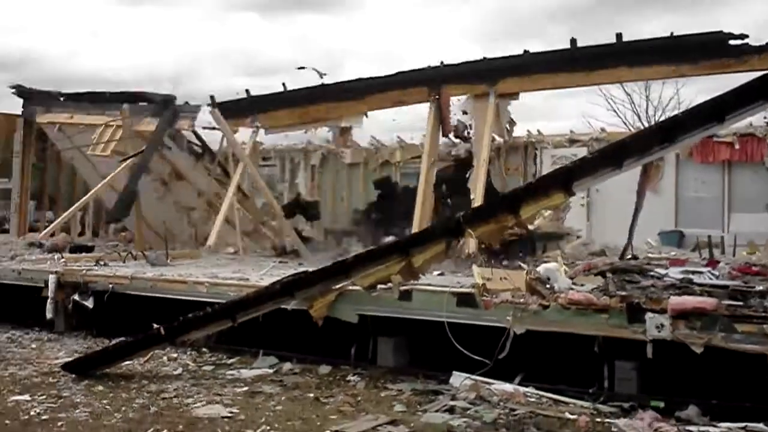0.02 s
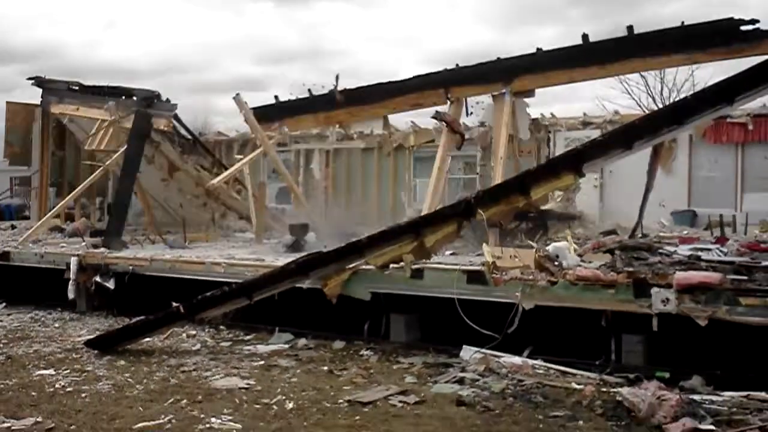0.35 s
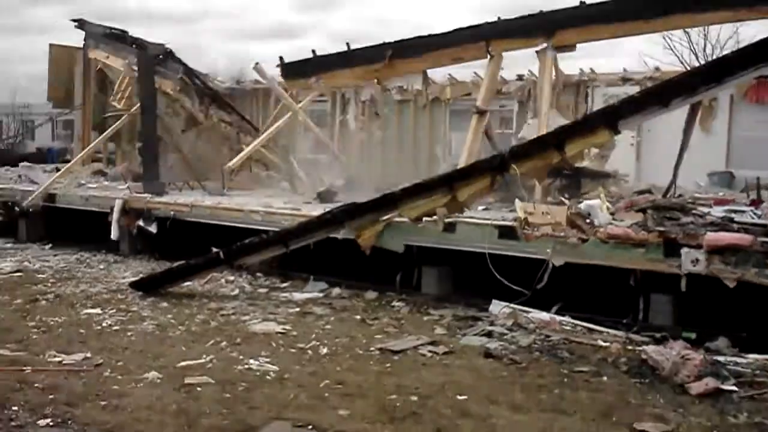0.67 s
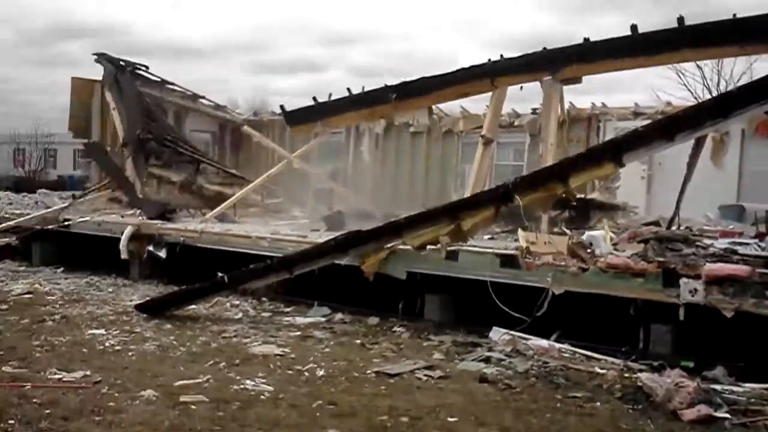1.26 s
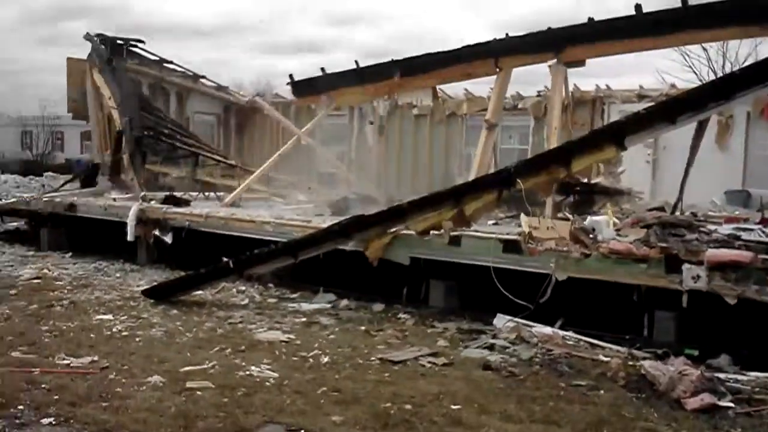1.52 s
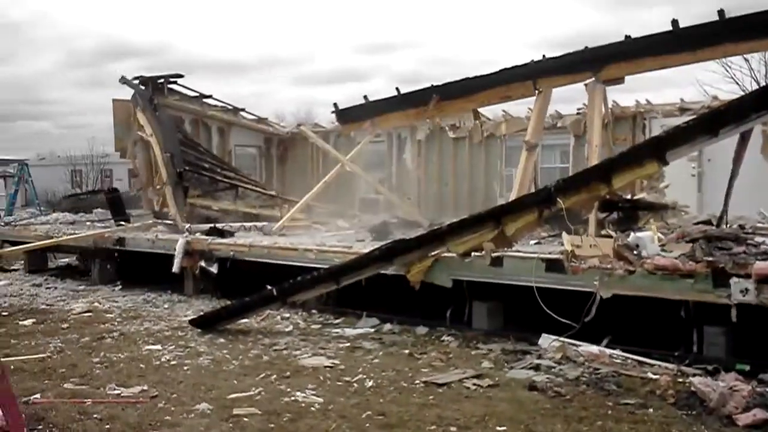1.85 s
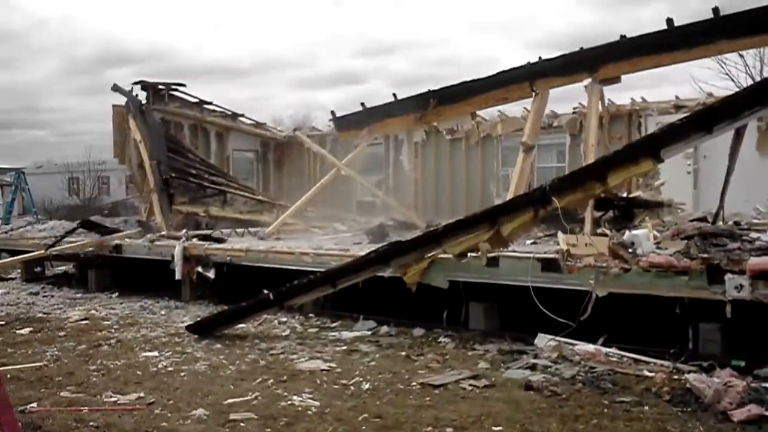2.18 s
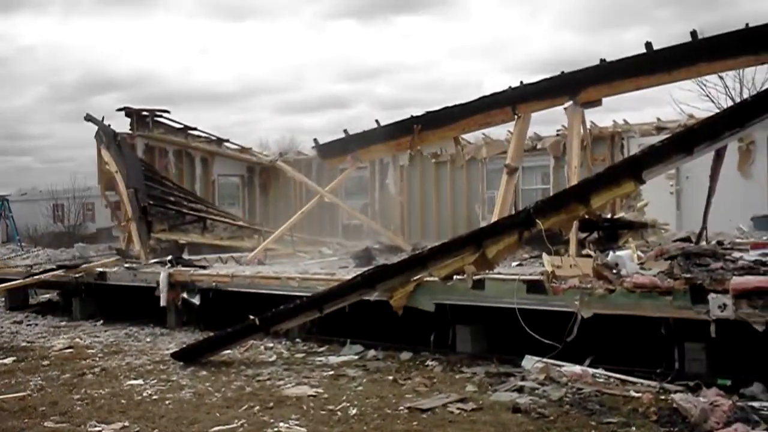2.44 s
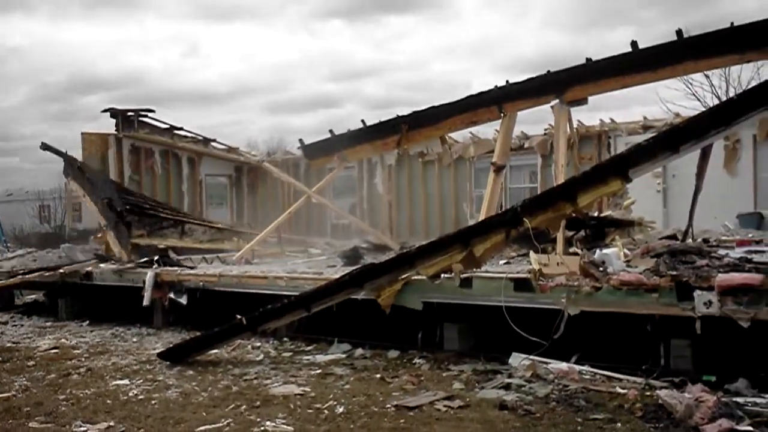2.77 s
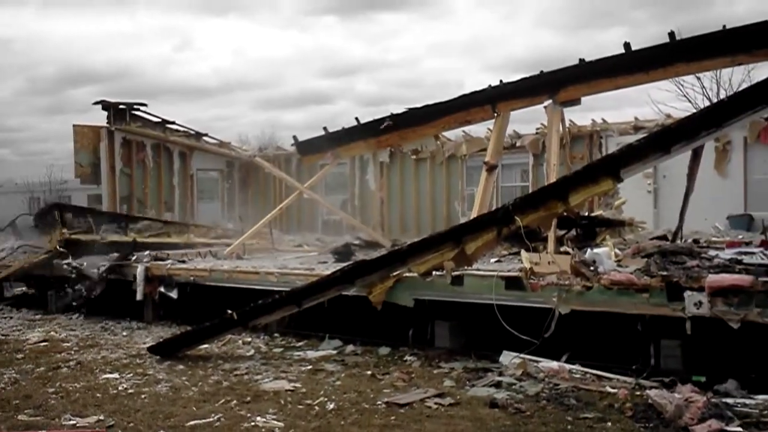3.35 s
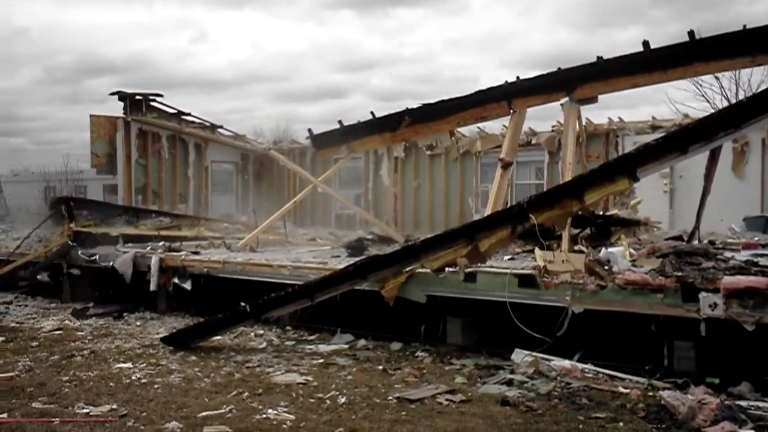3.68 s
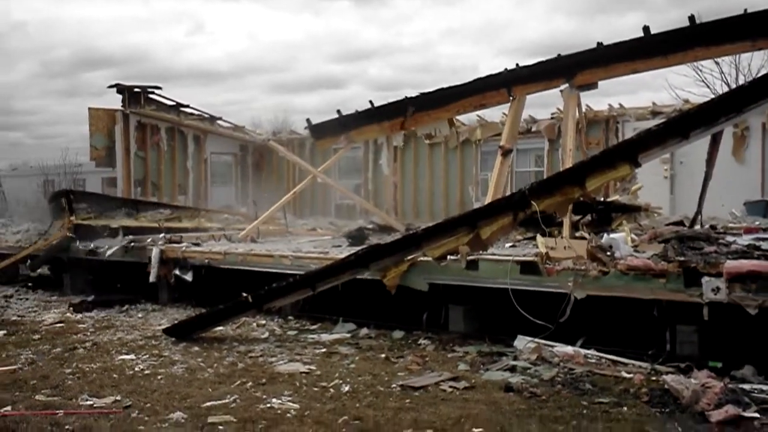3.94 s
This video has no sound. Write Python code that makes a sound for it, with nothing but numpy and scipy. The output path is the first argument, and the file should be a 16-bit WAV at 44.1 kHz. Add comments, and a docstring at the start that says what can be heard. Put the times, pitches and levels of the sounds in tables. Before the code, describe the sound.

Timber crashes down with sharp snaps, knocking boards and pattering splinters above a low rumble.

```python
"""Pulling down a burnt-out timber house

Heard from the yard, a wall crashes in: studs snap and tear fibre by fibre, loose boards knock and ring
on the deck, and heavy timber makes it shudder. Scraps clatter and splinters patter down throughout;
near the end a heavy beam lands. A low rumble of wind or machinery lies underneath.
The loudest blows clip, and the highs are cut off steeply above 7.6 kHz."""
import sys
import numpy as np
from scipy import signal
from scipy.fft import rfft, irfft
from scipy.io import wavfile

SR = 44100
rng = np.random.default_rng(int(sys.argv[2]) if len(sys.argv) > 2 else 0)


def persist_wave(psi):
    """Save psi, clipped to +-1, as 16-bit WAV."""
    counts = np.round(np.clip(psi, -1, 1) * 32767).astype(np.int16)
    wavfile.write(sys.argv[1], SR, np.atleast_2d(counts).T)


N = 176400
TIME = np.arange(N) / SR

# fader rides for the falling debris: (time [s], clatter level [dB], splinter level [dB])
DEBRIS_LEVELS = [(0.0, -4, -5.5), (0.26, -11.5, -9), (0.4, -12.5, -12.5), (0.7, -23, -19),
                 (0.93, -21, -18.5), (1.14, -22, -18), (1.65, -16.5, -15), (1.8, -18.5, -17.5),
                 (2.21, -29.5, -25), (2.45, -29.5, -23.5), (2.7, -26, -24), (2.85, -20, -20.5),
                 (2.99, -22, -23.5), (3.16, -26.5, -24), (3.41, -22, -23.5), (3.56, -24, -20),
                 (3.79, -28.5, -22.5), (4.0, -36.5, -31)]
# hollow tone of tumbling scraps: (frequency [Hz], level [dB])
CLATTER_TONE = [(250, -4.5), (420, -8.5), (650, 0.5), (900, -5), (1500, -4), (2500, -5.5), (4000, -11.5),
                (8000, -33)]
# bright tone of splinters and snapping fibres: (frequency [Hz], level [dB])
SNAP_TONE = [(800, -8), (2200, -36), (3300, -5.5), (4700, 0.5), (5800, -6.5), (7200, -15), (10000, -7.5)]
# swells of the rumble: (time [s], level [dB])
RUMBLE_SWELLS = [(0.0, -12), (0.36, -17), (0.46, -18), (0.6, -23.5), (0.72, -26), (1.17, -24.5),
                 (2.08, -25), (2.25, -29.5), (2.47, -27.5), (2.8, -19.5), (2.94, -21), (3.15, -27.5),
                 (3.34, -29.5), (3.54, -20), (3.73, -27), (4.0, -26.5)]
# bass-heavy tone of the rumble: (frequency [Hz], level [dB])
RUMBLE_TONE = [(12, 3), (25, -12.5), (50, -4.5), (90, 1.5), (140, 1.5), (210, -2.5), (320, -16.5),
               (500, -27.5), (1500, -28), (6000, -66)]
# timber cracking: (time [s], tear length [s], woody body level [dB], bright snap level [dB])
TIMBER_CRACKS = [(.002, 0.15, -34, -28), (0.116, 0.091, -17.5, -12), (0.181, 0.044, -9.5, -6),
                 (0.289, 0.014, -9.5, -8), (0.324, 0.01, -11.5, -16), (0.361, 0.024, -13, -13.5),
                 (0.451, 0.059, -21, -16), (.634, 0.024, -10, -2.5), (0.706, 0.027, -15, -14.5),
                 (.844, 0.001, -17, -22), (0.934, 0.0059, -7, -1.5), (.955, 0.0061, -22, -13.5),
                 (1.001, 0.0035, -15, -15), (1.067, 0.0068, -11.5, -7.5), (1.091, 0.031, -5, 0),
                 (1.169, 0.01, -10.5, -14), (1.201, .012, -25, -14), (1.264, 0.012, -21, -17.5),
                 (1.337, 0.034, -12, -14.5), (1.412, 0.018, -33, -23), (1.547, 0.05, -12, -11.5),
                 (1.621, 0.037, -12.5, -10.5), (1.665, 0.049, -15.5, -16), (1.832, .003, -25, -13),
                 (1.925, 0.012, -14, -17.5), (1.973, 0.0012, -31, -14), (1.993, 0.0053, -33, -14),
                 (2.07, 0.0027, -41, -19.5), (2.146, 0.0011, -18.5, -14.5), (2.362, 0.0014, -30, -10),
                 (2.387, 0.00093, -37, -29), (2.538, 0.0036, -36, -25), (2.605, 0.0048, -28, -18),
                 (2.623, 0.0065, -27, -20), (2.707, 0.0026, -19.5, -25), (2.727, 0.0011, -24, -19),
                 (2.773, 0.0025, -23, -19.5), (2.821, .02, -11.5, -13), (2.853, 0.008, -12, -16.5),
                 (2.904, 0.0061, -16, -45), (2.969, 0.0098, -12, -19), (2.988, 0.012, -18, -19.5),
                 (3.019, 0.003, -19.5, -24), (3.108, 0.016, -14, -19.5), (3.383, 0.067, -17.5, -16),
                 (3.464, .025, -19, -17.5), (3.494, 0.0029, -20, -5), (3.508, 0.012, -22, -11),
                 (3.561, .009, -17.5, -10), (3.584, 0.021, -17.5, -11), (3.616, 0.017, -15, -12),
                 (3.636, 0.034, -19.5, -14), (3.676, 0.014, -21, -16), (3.703, 0.0046, -11.5, -14),
                 (3.853, .009, -48, -19.5), (3.956, .001, -31, -12.5)]
# woody midrange body of a crack: (frequency [Hz], level [dB])
WOODY_TONE = [(200, -30), (500, -3), (1000, -4.5), (1800, -4.5), (2700, -4), (4000, -6), (8000, -47)]
# loose boards and laths striking: (time [s], pitch [Hz], peak level [dB], ring time to -60 dB [s])
BOARD_KNOCKS = [(.046, 581, 1, 0.075), (.192, 565, 7, 0.065), (.205, 777, 9, 0.039),
                (.325, 754, 16.5, 0.027), (.378, 335, -1.5, 0.042), (0.625, 350, -13, 0.059),
                (.636, 1746, 0.5, 0.041), (0.717, 572, 3, 0.051), (0.804, 1630, -6, 0.029),
                (.842, 574, -8, 0.041), (.931, 269, -4, 0.07), (.974, 356, -6, 0.016),
                (1.045, 576, -9, 0.15), (1.085, 782, -3.5, 0.036), (1.099, 1650, 2, 0.059),
                (1.172, 1093, -10, .05), (1.2, 580, -15, 0.051), (1.267, 582, -6, 0.07),
                (1.337, 569, 4.5, 0.05), (1.415, 990, -3.5, 0.019), (1.526, 1030, -9, 0.031),
                (1.547, 554, -0.5, 0.082), (1.577, 910, 2, .05), (1.581, 1140, 3, .05),
                (1.597, 420, -3, .06), (1.69, 980, -1.5, 0.023), (1.927, 187, 0, 0.074),
                (1.928, 966, 3, 0.013), (1.993, 5130, -4.5, .04), (2.121, 797, -6, 0.04),
                (2.129, 910, -10.5, 0.041), (2.261, 1090, -9, 0.018), (2.362, 4390, -6, .022),
                (2.543, 3580, -11, 0.03), (2.604, 4380, -9.5, .04), (2.607, 680, -14, 0.09),
                (2.623, 2286, -6.5, 0.036), (2.708, 3450, -8.5, .03), (2.729, 3700, -8, 0.022),
                (2.774, 4660, -10, .03), (2.825, 780, 1, 0.044), (2.829, 652, 5.5, .06),
                (2.903, 1070, -9.5, .03), (2.973, 1140, -2.5, .04), (2.99, 1180, -6, 0.026),
                (3.111, 2190, -2.5, 0.033), (3.128, 1660, -5.5, 0.036), (3.2, 1080, -10.5, 0.034),
                (3.468, 1930, -5.5, 0.034), (3.519, 5740, 0, 0.014), (3.562, 2860, -0.5, 0.033),
                (3.619, 1184, 1, 0.028), (3.703, 1790, -1.5, 0.022), (3.855, 5350, -2, 0.021)]
# modes of a struck board: (frequency [multiple of its pitch], level [dB])
BOARD_MODES = [(1, 1), (1.13, -7), (0.862, -11), (1.62, -19), (2.301, -40), (3.4, -12.5)]
# heavy timber landing on the deck: (time [s], pitch [Hz], level [dB], decay time [s])
DECK_THUDS = [(0.101, 140, -17, 0.024), (0.319, 194, -5, 0.057), (0.511, 131, -8, 0.031),
              (0.537, 69.5, -18, 0.025), (.6, 129, -14, 0.026), (0.928, 181, -9.5, 0.053),
              (1.059, 127, -10, 0.081), (1.334, 167, -12.5, 0.065), (1.571, 184, -6.5, 0.075),
              (1.579, 75, -8, 0.083), (1.926, 167, -8.5, 0.018), (2.088, 107, -8, 0.0093),
              (2.85, 218, -18.5, 0.037), (2.975, 218, -18, 0.046), (3.111, 174, -15, 0.025),
              (3.32, 84, -8, 0.047), (3.378, 113, -1.5, 0.064), (3.386, 178, -5, 0.048),
              (3.394, 45, -15, 0.077), (3.675, 218, -18, 0.037)]


def from_db(db):
    """Decibels to gain."""
    return 10 ** (np.asarray(db) / 20)


def unit_rms(x):
    """Scale to an rms of 1."""
    return x / np.sqrt(np.mean(x ** 2) + 1e-20)


def in_time(rows):
    """Each level column of a fader ride, at every sample."""
    times, *columns = np.transpose(rows)
    return [np.interp(TIME, times, column) for column in columns]


def gain_at(tone, hz):
    """Gain of a tone curve at these frequencies."""
    points_hz, db = np.transpose(tone)
    return from_db(np.interp(np.log(hz + 1), np.log(points_hz), db))


def colour(x, tone):
    """Minimum-phase EQ that keeps the power of white noise."""
    size = 2 * N
    gains = unit_rms(gain_at(tone, np.arange(N + 1) * SR / size))
    cepstrum = irfft(np.log(gains))
    cepstrum[1:N] *= 2
    cepstrum[N + 1:] = 0
    return irfft(rfft(x, size) * np.exp(rfft(cepstrum)))[:N]


def ring(clicks, hz, t60):
    """A resonator: each click sets off a dying sine of its own height."""
    radius = np.exp(-np.log(1000) / (t60 * SR))
    angle = 2 * np.pi * hz / SR
    return signal.lfilter([0, np.sin(angle)], [1, -2 * radius * np.cos(angle), radius ** 2], clicks + 1e-18)


def add(out, start_s, sound):
    """Mix a sound in at its cue."""
    start = int(start_s * SR)
    out[start:start + len(sound)] += sound[:N - start]


def fragments(low_hz, high_hz, tone, per_s, ring_cycles, count=48, spread_db=2.9):
    """Random hits, mostly small, ring wood pieces of many sizes over an equally strong wash of noise."""
    strengths = from_db(spread_db * np.minimum(rng.exponential(1, N), 5)) * rng.choice([-1, 1], N)
    clicks = strengths * (rng.random(N) < per_s / SR)
    piece_hit = rng.integers(0, count, N)
    pitches = np.geomspace(low_hz, high_hz, count) * rng.uniform(.98, 1.02, count)
    pieces = sum(hz * gain_at(tone, hz) * ring(clicks * (piece_hit == piece), hz, ring_cycles / hz)
                 for piece, hz in enumerate(pitches))
    wash = colour(rng.standard_normal(N), tone)
    return unit_rms(unit_rms(pieces) + wash)


def debris(trim_db=-2):
    """Falling scraps of wood clatter in the mids while small splinters patter on top."""
    clatter_db, splinter_db = in_time(DEBRIS_LEVELS)
    clatter = fragments(373, 2850, CLATTER_TONE, per_s=700, ring_cycles=11)
    splinters = fragments(2360, 7480, SNAP_TONE, per_s=2200, ring_cycles=13)
    return from_db(trim_db) * (from_db(clatter_db) * clatter + from_db(splinter_db) * splinters)


def rumble(trim_db=3):
    """A low bed of wind or machinery noise, swelling as the structure moves."""
    level_db, = in_time(RUMBLE_SWELLS)
    return from_db(trim_db + level_db) * colour(rng.standard_normal(N), RUMBLE_TONE)


def cracks(decay_s=0.0064, first_snap_db=13):
    """Timber parts with one sharp snap; ringing fibres go in a dense run while it tears, then die away."""
    starts, lengths, woody_db, snap_db = np.transpose(TIMBER_CRACKS)
    out, t = np.zeros(N), TIME[:SR // 4]
    layers = (woody_db, WOODY_TONE, 600, 3400), (snap_db, SNAP_TONE, 2300, 8000)
    for levels_db, tone, low_hz, high_hz in layers:
        tearing, first_snaps = np.zeros(N), np.zeros(N)
        for start_s, tear_s, gain in zip(starts, lengths, from_db(levels_db)):
            add(tearing, start_s, gain * np.exp(-np.maximum(t - tear_s, 0) / decay_s))
            add(first_snaps, start_s, np.array([gain]))
        fibres = fragments(low_hz, high_hz, tone, per_s=2500, ring_cycles=29.4)
        out += tearing * fibres + from_db(first_snap_db) * colour(first_snaps, tone)
    return out


def knocks(rattle_db=-30, rattle_decay_s=.01):
    """A blow and a brief rattle ring a loose board; its higher modes die sooner."""
    out, t = np.zeros(N), TIME[:SR // 4]
    for start_s, hz, db, t60 in BOARD_KNOCKS:
        contact = from_db(rattle_db) * rng.standard_normal(len(t)) * np.exp(-t / rattle_decay_s)
        contact[0] = 1  # the blow itself
        board = sum(from_db(mode_db) * ring(contact, hz * ratio, t60 / ratio)
                    for ratio, mode_db in BOARD_MODES)
        add(out, start_s, from_db(db) * board / np.abs(board).max())
    return out


def thuds(attack_s=0.0061, band_ratio=1.6):
    """The deck shudders in a broad low band after each heavy landing."""
    out, t = np.zeros(N), TIME[:SR // 2]
    for start_s, hz, db, decay_s in DECK_THUDS:
        band = signal.butter(2, [hz / band_ratio, hz * band_ratio], "band", fs=SR, output="sos")
        shudder = signal.sosfilt(band, rng.standard_normal(SR))[-len(t):]
        envelope = (1 - np.exp(-t / attack_s)) * np.exp(-t / decay_s)
        envelope_rms = np.sqrt(np.mean(envelope ** 2))
        add(out, start_s, from_db(db) * envelope_rms * unit_rms(shudder * envelope))
    return out


def yard_echoes(x, predelay_s=0.015, t60=0.21, wet_db=-14):
    """A short tail of scattered echoes off the standing walls and the ground."""
    t = TIME[:SR // 2]
    tail = rng.standard_normal(len(t)) * (t > predelay_s) * np.exp(-np.log(1000) * t / t60)
    return from_db(wet_db) * signal.fftconvolve(x, tail / np.linalg.norm(tail))[:N]


def overload(x, ceiling, hardness=11.7):
    """Flatten the peaks against a ceiling, with a tight knee."""
    return x / (1 + np.abs(x / ceiling) ** hardness) ** (1 / hardness)


def scene():
    """The mono mix: cracks and knocks echo round the yard; thuds, debris and rumble stay dry."""
    blows = cracks() + knocks()
    return (blows + yard_echoes(blows) + thuds() + debris() + rumble())[None]


def record(dry):
    """The loudest blows clip, the highs are cut steeply above 7.6 kHz, and remaining peaks flatten."""
    treble_cut = signal.butter(18, 7607, fs=SR, output="sos")
    final_lowpass = signal.ellip(10, .1, 80, 15900, fs=SR, output="sos")
    dulled = signal.sosfilt(treble_cut, overload(dry, ceiling=0.65))
    return signal.sosfilt(final_lowpass, overload(dulled, ceiling=.76))


dry = scene()
out = record(dry)
persist_wave(out)
```